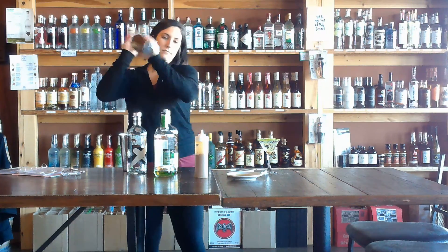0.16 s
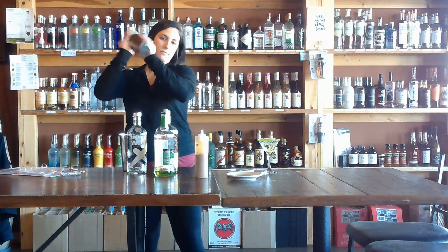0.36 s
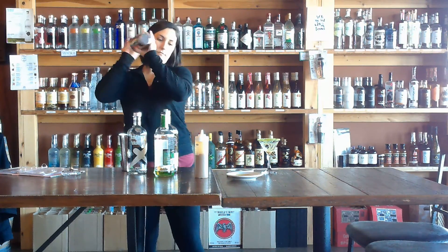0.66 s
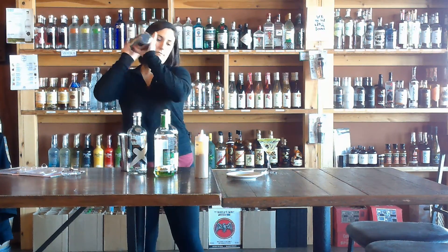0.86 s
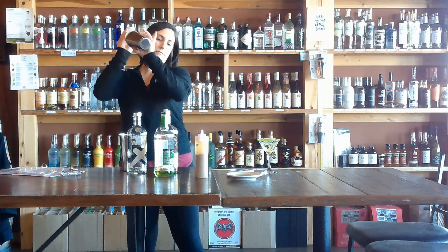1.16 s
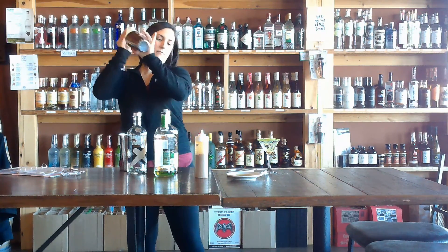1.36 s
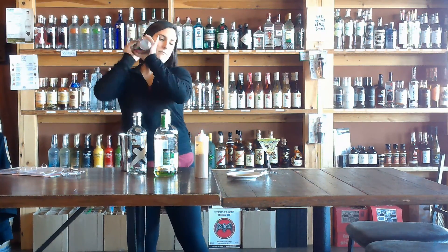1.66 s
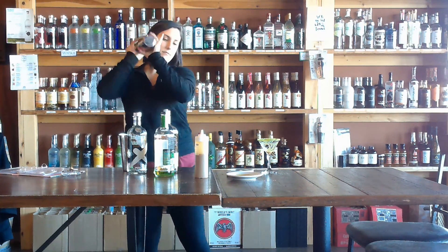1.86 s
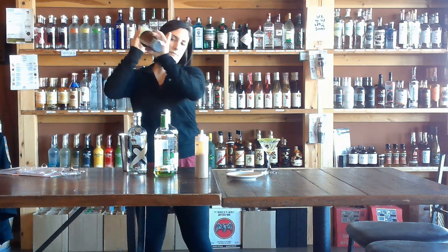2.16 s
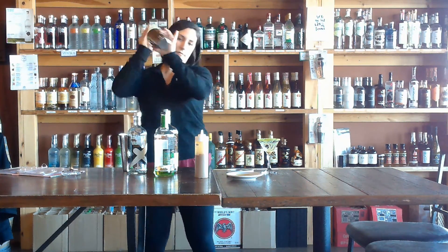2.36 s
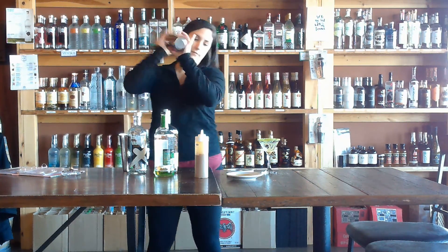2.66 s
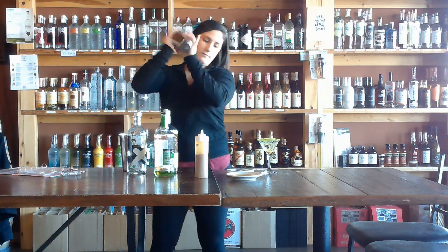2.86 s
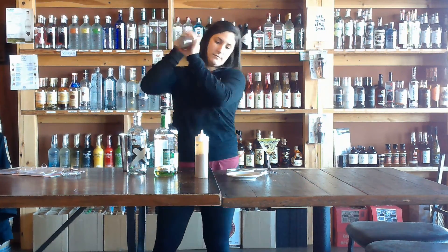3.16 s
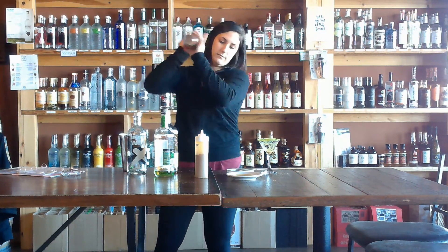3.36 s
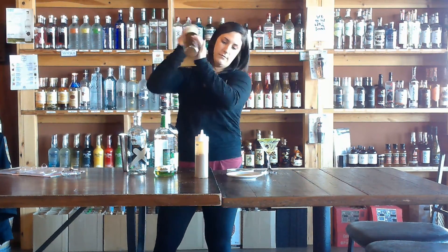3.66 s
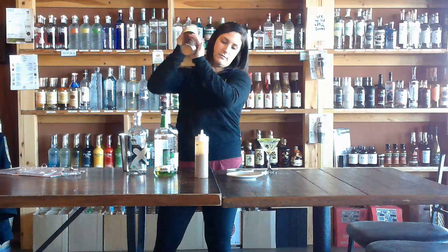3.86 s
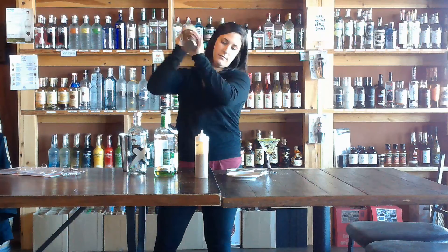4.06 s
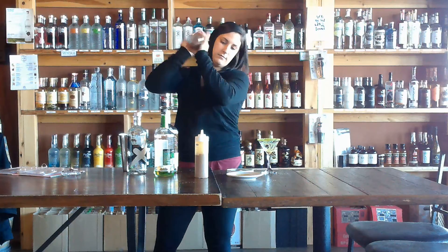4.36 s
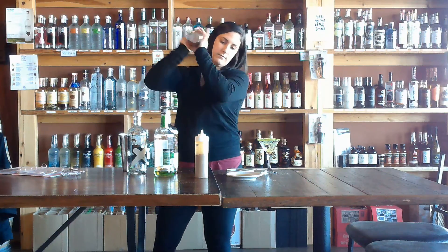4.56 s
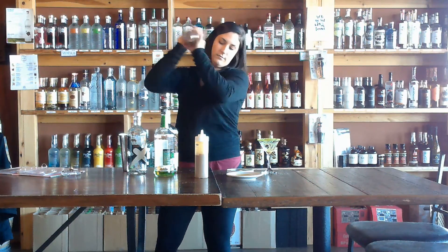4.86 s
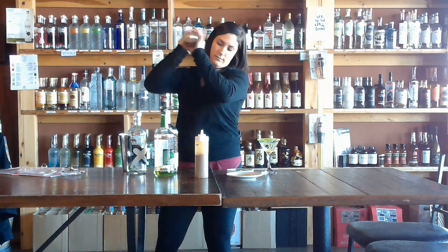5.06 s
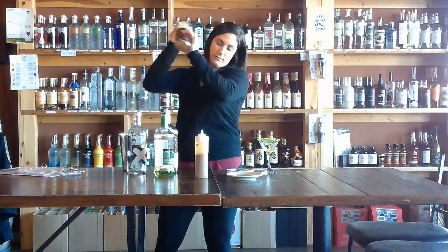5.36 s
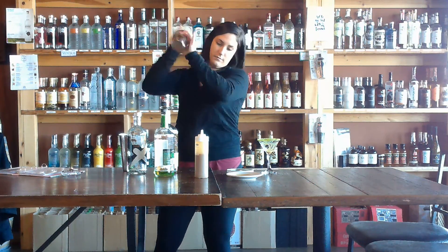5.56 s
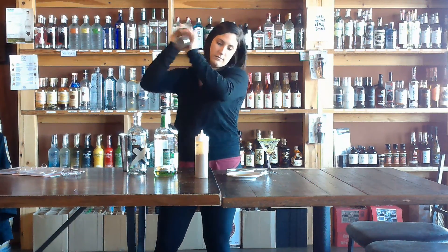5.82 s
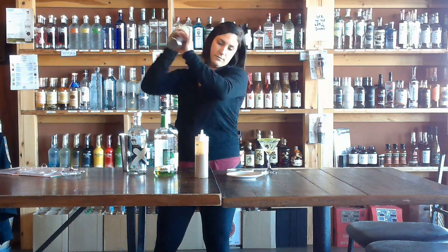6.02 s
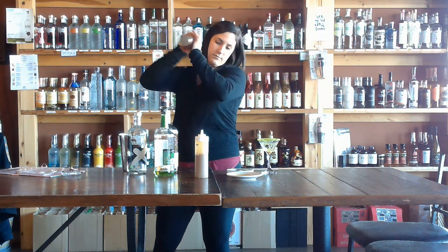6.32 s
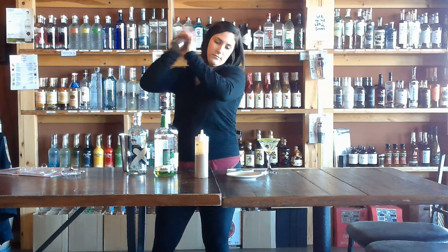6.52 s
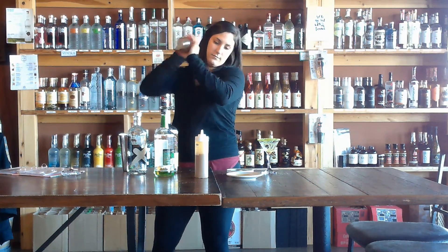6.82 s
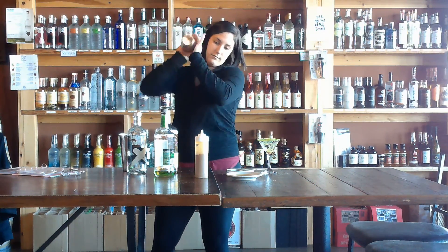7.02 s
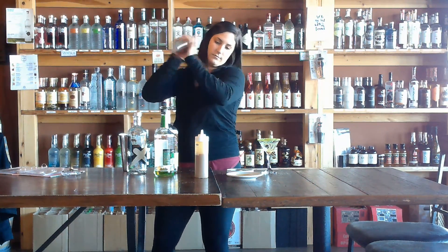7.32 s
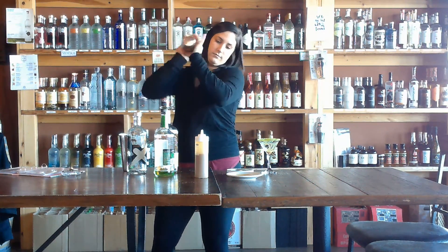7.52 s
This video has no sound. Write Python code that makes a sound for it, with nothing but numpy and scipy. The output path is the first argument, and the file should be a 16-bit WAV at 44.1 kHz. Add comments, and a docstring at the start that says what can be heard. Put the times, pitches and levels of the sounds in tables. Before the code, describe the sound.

From 0 to about 7.7 seconds, ice is shaken vigorously in a hand-held steel cocktail tin, already in motion at the start and still going at the end. Nearly ten strokes a second land alternately at the cap, brighter and fizzier, and at the base, lower with a muted slosh. Each is a grainy burst of damped metallic ringing around 1.7 to 6 kHz. Loudness varies; strokes thin out around 1.7, 3.5 and 4.5 seconds. Short hollow cube knocks stand out near 1.0, 1.4, 2.4, 3.9 and 5.4, with dry ice ticks scattered between. Early echoes and a reverberant tail under a second suggest a wooden bar, heard from a few metres, the tin slightly right. Underneath, a low vehicle engine swells until 1.2, drops to a lower note near 1.8 and recedes by 3, leaving faint traffic rumble, bassy room tone and fridge hum.

```python
"""Ice is shaken in a steel cocktail tin a few metres from a stereo microphone in a wooden bar room.
Each stroke ends in a shower of grains ringing the tin's modes, a fizz of chips and a slosh;
damped sines make the knocks of big cubes, very short noise snaps their cracks and lone ticks.
The room answers with a cluster of echoes and a tail of decaying noise bands; behind it lie
noise-band room tone, a fridge's sine hum and resonant noise for a vehicle and traffic outside."""
import sys
import numpy as np
from scipy import signal
from scipy.fft import rfft, irfft
from scipy.io import wavfile

SR = 44100
rng = np.random.default_rng(int(sys.argv[2]) if len(sys.argv) > 2 else 0)


def transcribe(signal):
    """Save signal, clipped to [-1, 1], as a 16-bit WAV file at the path in sys.argv[1]."""
    frames = np.atleast_2d(signal).T
    limited = np.clip(frames, -1, 1)
    pcm = np.round(limited * 32767).astype(np.int16)
    wavfile.write(sys.argv[1], SR, pcm)


def nominal_scale(level):
    """Amplitude ratio for a level in decibels (scalar or array-like)."""
    x = np.asarray(level, float) / 20
    return 10 ** x


N = 338996
T = np.arange(N) / SR

# The load lands in the cap and on the base of the tin in turn, cap first.
# Each row: start in seconds, relative ice level in dB, relative fizz level of fine chips in dB.
STROKES = [(0.046, -33, -60), (0.144, -37, -45), (0.223, -35, -43), (0.341, -39, -55),
           (0.432, -36.5, -39.5), (0.568, -34, -32.5), (0.7, -30.5, -35), (0.779, -36, -36),
           (0.875, -33.5, -39), (0.966, -28.5, -30.5), (1.075, -29.5, -36), (1.19, -36, -40),
           (1.281, -31, -34.5), (1.387, -35, -40), (1.48, -37.5, -43), (1.582, -33.5, -38),
           (1.68, -56.5, -55), (1.785, -50.5, -59.5), (1.89, -34, -40), (1.984, -30, -34),
           (2.112, -37, -39), (2.203, -33.5, -37), (2.31, -35, -37), (2.394, -34.5, -34),
           (2.506, -35.5, -35), (2.631, -38, -47), (2.735, -29.5, -37), (2.831, -29, -30),
           (2.949, -34, -44), (3.052, -33.5, -34), (3.153, -32.5, -34.5), (3.248, -36, -37),
           (3.377, -34, -32), (3.469, -58.5, -52), (3.57, -37.5, -39), (3.672, -33.5, -38),
           (3.778, -30.5, -35), (3.88, -28.5, -38), (4.014, -32, -37.5), (4.102, -36, -40),
           (4.233, -32, -33), (4.315, -36, -38), (4.445, -30, -35.5), (4.541, -57, -56),
           (4.643, -32.5, -52), (4.737, -35, -36), (4.85, -30.5, -33.5), (4.94, -31, -35),
           (5.04, -38, -41.5), (5.161, -44.5, -55), (5.276, -32, -31), (5.36, -37, -32), (5.496, -30, -42),
           (5.618, -30.5, -45), (5.711, -33.5, -35), (5.844, -33.5, -36), (5.968, -29, -32.5),
           (6.071, -35.5, -35), (6.194, -31.5, -37), (6.289, -34.5, -48), (6.393, -31.5, -47.5),
           (6.517, -40, -53), (6.636, -32, -36), (6.749, -51, -43), (6.836, -32, -42), (6.953, -38.5, -39),
           (7.062, -30.5, -33.5), (7.174, -34, -37), (7.292, -28.5, -32), (7.412, -37.5, -34),
           (7.552, -29, -38.5), (7.661, -36, -42)]


def unit(x):
    """Scale to rms 1."""
    return x / np.sqrt(np.mean(x ** 2))


def shape(x, gain):
    """Filter by a gain given as a function of Hz."""
    n = x.shape[-1]
    freq_hz = np.arange(n // 2 + 1) * SR / n + 1  # 1 Hz up, clear of zero
    return irfft(rfft(x) * gain(freq_hz), n)


def colour(x, points):
    """Filter through (Hz, dB) points, interpolated over log frequency."""
    hz, db = np.transpose(points)
    return shape(x, lambda f: nominal_scale(np.interp(np.log(f), np.log(hz), db)))


def resonate(x, modes):
    """Sum of (Hz, width Hz, dB) resonances of alternating sign that ring after their cause."""
    def response(f):
        total = 0
        for k, (hz, width_hz, db) in enumerate(modes):
            total = total + (-1) ** k * nominal_scale(db) / (1 + 1j * (f - hz * hz / f) / width_hz)
        return total
    return shape(x, response)


def add(out, start_s, sound):
    """Mix a sound in at start_s."""
    i = max(int(start_s * SR), 0)
    out[i:i + len(sound)] += sound[:N - i]


def rattle():
    """Pieces ring the tin, fine chips fizz, the liquid thumps lower."""
    # Chips crowd into the cap, the liquid falls on the base.
    # Each holds: chips over the ice in dB, relative slosh level in dB.
    cap_end = (4.9, -56)
    base_end = (-4.5, -37.5)
    # Slosh resonances. Each row: centre in Hz, width in Hz, relative level in dB.
    slosh_modes = [(730, 270, -21.5), (1098, 250, 2.5), (1410, 270, -3.5)]
    # Spectrum of the fine chips. Each row: frequency in Hz, relative density in dB per Hz.
    fizz_spectrum = [(3000, -35.5), (6000, 1), (8000, 1.5), (11000, 1.5), (14000, 3.5), (15800, 3.5),
                     (20000, -31)]
    _, cubes_db, fizz_db = np.transpose(STROKES)
    more_chips_db, slosh_db = np.resize([cap_end, base_end], (len(STROKES), len(cap_end))).T
    cubes = surge(cubes_db, 0.0016, 0.012, -45.5)
    chips = surge(cubes_db + more_chips_db, 0.0013, 0.012, -41.5)
    fizz = grains(6000, 2.4) * surge(fizz_db, 0.00046, 0.013, -46.5)
    slosh = grains(3000, 3.9) * surge(slosh_db, 0.0028, 0.021, -65)
    # the lowest mode rings most when cubes and liquid land together
    base = surge(0.59 * cubes_db + 0.381 * slosh_db, 0.0025, 0.015, -46.5)
    ringing = nominal_scale(10.5) * clatter(base, cubes, chips)
    return ringing + nominal_scale(5.5) * colour(fizz, fizz_spectrum) + nominal_scale(14.5) * resonate(slosh, slosh_modes)


def clatter(base, cubes, chips):
    """Every piece lands somewhere else, so it rings one mode, at a pitch shifted by the load on the wall."""
    # Hand-damped tin: cubes ring its low modes, chips the high ones.
    # Each row: unshifted centre in Hz, width in Hz, relative level in dB.
    tin_modes = [(1750, 314, 4.5), (2260, 700, -4), (3095, 444, 0.5), (3700, 270, -1.5), (4540, 380, -4.5),
                 (5430, 570, -6.5), (6450, 3500, -11.5)]
    out = np.zeros(N)
    for hz, width_hz, db in tin_modes:
        shower = base if hz < 2000 else cubes if hz < 4000 else chips
        for shift in (-0.026, 0, 0.026):  # share of the pitch
            out += resonate(grains(400, 3.3) * shower, [(hz * (1 + shift), width_hz, db)])
    return out


def grains(per_s, spread_db):
    """Random small collisions, most faint, a few strong."""
    size = rng.standard_normal(N) * nominal_scale(spread_db * np.minimum(rng.exponential(size=N), 4))
    return unit(size * (rng.random(N) < per_s / SR))


def surge(stroke_db, base_rise_s, power_fall_s, between_db):
    """Level of a shower that swells as the load arrives and thins as it settles; loose ice slides in between."""
    cap_slower = 3.0  # the narrow cap fills more gradually than the flat base
    t = T[:SR // 2]
    power = np.full(N, nominal_scale(2 * between_db))
    for k, (start_s, level_db) in enumerate(zip(np.transpose(STROKES)[0], stroke_db)):
        rise_s = base_rise_s * (1 if k % 2 else cap_slower)
        rise = 1 - np.exp(-t / rise_s)
        add(power, start_s, nominal_scale(2 * level_db) * rise ** 2 * np.exp(-t / power_fall_s))
    return np.sqrt(power)


def knocks():
    """Each cube rings the held tin for a few milliseconds, at a pitch set by where the load lies."""
    # Big cubes hit the tin, each 1 ms ahead of its listed time. Each row: time in seconds,
    # relative ring level in dB, ring pitch in Hz, relative crack level in dB, ring length in seconds.
    cube_hits = [(0.3533, -17.5, 1660, -49, 0.0018), (0.7646, -16.5, 1710, -31, 0.0032),
                 (0.9646, -12.5, 1790, -22, 0.0036), (1.3884, -12.5, 1785, -31.5, 0.0034),
                 (1.5764, -13.5, 1748, -26, 0.0036), (1.6206, -20, 1780, -44, 0.0032),
                 (1.7881, -16.5, 1756, -45, 0.0025), (1.99, -18, 1788, -17, 0.0094),
                 (2.193, -17.5, 1715, -36, 0.0043), (2.399, -17, 1750, -20, 0.012),
                 (2.629, -17.5, 1705, -24, 0.0035), (2.839, -21, 1560, -19.5, 0.0025),
                 (3.0542, -22.5, 1750, -26, 0.003), (3.2532, -19.5, 1750, -29, 0.0076),
                 (3.677, -21.5, 1584, -39.5, 0.0033), (3.8903, -9.5, 1758, -40, 0.0042),
                 (4.113, -17.5, 1696, -45, 0.0043), (4.3178, -25.5, 1680, -41, .004),
                 (4.95, -24.5, 1790, -43, 0.0032), (5.3668, -15.5, 1767, -20, 0.0044),
                 (5.487, -30, 1750, -27.5, .004), (6.0583, -17, 1768, -33, 0.0027),
                 (6.733, -20, 1750, -27, 0.0033), (6.9611, -30, 1800, -24, 0.0044),
                 (7.1074, -28, 1730, -37, 0.0045), (7.172, -19.5, 1800, -24.5, 0.0023),
                 (7.377, -29, 1970, -39, .003), (7.673, -24, 1730, -36.5, .004)]
    out, t = np.zeros(N), T[:SR // 16]
    push = 1 - np.exp(-t / 0.0005)
    thud = 0.092 * np.sin(2 * np.pi * 1100 * t) * np.exp(-np.log(1000) * t / 0.033)
    for (s, db, hz, crack_db, ring_s), noise in zip(cube_hits, rng.standard_normal((len(cube_hits), 256))):
        ring = np.sin(2 * np.pi * hz * t) + 0.17 * np.sin(2 * np.pi * 1.17 * hz * t)
        decay = np.exp(-(t / ring_s) ** 2) + 0.16 * np.exp(-t / (3.7 * ring_s))
        add(out, s - 0.001, nominal_scale(db + 4) * push * (ring * decay + thud))
        add(out, s - 0.001, nominal_scale(crack_db + 14.5) * crack(noise))
    return out


def ticks():
    """Lone sharp ticks of ice on ice: each a single snap."""
    # Each row: start in seconds, relative level in dB.
    ice_ticks = [(0.145, -17), (0.17, -18), (0.3845, -20), (0.552, -22), (3.3822, -15), (4.2486, -16),
                 (4.736, -21.5), (5.284, -27.5), (5.624, -19), (5.7039, -16), (5.9714, -21), (6.5126, -22),
                 (7.406, -19), (7.5451, -23)]
    out = np.zeros(N)
    for (start_s, db), noise in zip(ice_ticks, rng.standard_normal((len(ice_ticks), 256))):
        add(out, start_s, nominal_scale(db + 8.5) * crack(noise))
    return out


def crack(noise):
    """Very short snap: coloured noise falling 60 dB in 5 ms."""
    # Spectrum of the snap. Each row: frequency in Hz, relative density in dB per Hz.
    snap_spectrum = [(800, -12), (2000, -37), (5000, 0), (8000, -16.5), (10500, -5.5), (14500, -3.5)]
    return colour(noise, snap_spectrum) * np.exp(-np.log(1000) * T[:len(noise)] / 0.005)


def room(x):
    """The tin keeps moving, so each moment reaches the microphone by slightly different paths."""
    # The microphone's right side faces the tin: left port against right.
    # Each row: frequency in Hz, gain in dB.
    left_port = [(300, -6.7), (700, -2.5), (1600, -2.5), (2800, .1), (5000, 0), (12000, -0.5)]
    places, places_per_s, lead = 14, 40, 64  # lead in samples
    place = T * places_per_s % places
    out = np.zeros((2, N))
    for k in range(places):
        away = np.abs((place - k + places / 2) % places - places / 2)
        share = np.cos(np.pi / 2 * np.minimum(away, 1))
        # near paths of neighbouring places are alike and add in pressure, tails add in power
        near = signal.oaconvolve((x * share ** 2)[None], paths(lead), axes=1)
        out += near[:, lead:N + lead]
        wash = signal.fftconvolve((x * share)[None], tail(), axes=1)
        out += wash[:, :N]
        # the shaking has been going on: the room is already full at the start
        out[:, :wash.shape[1] - N] += nominal_scale(3.5) * wash[:, N:]
    return np.array([colour(out[0], left_port), out[1]])


def paths(lead):
    """Direct sound and first echoes from one place of the tin, all lead samples late."""
    # First echoes. Each row: mean delay in ms, relative left level in dB, relative right level in dB.
    first_echoes = [(12.834, 11, -34), (16.83, 6, 1), (19.87, 10.5, -17), (23.1, -5, 9.5), (25.32, -6, -23),
                    (36.06, -8, -43.5)]
    # Further shading of the direct sound on the left. Each row: frequency in Hz, gain in dB.
    left_shading = [(700, -16), (1750, -2.5), (3000, -6.5), (8000, -7.5), (15000, -6.5)]
    direct = signal.unit_impulse(shape=2048, idx=lead)
    echoes = np.zeros((2, len(direct)))
    shifts_ms = 0.066 * rng.standard_normal(len(first_echoes))
    for (ms, left_db, right_db), shift_ms in zip(first_echoes, shifts_ms):
        i = lead + int((ms + shift_ms) * SR / 1000)
        echoes[:, i] = nominal_scale(-10.0 + np.array([left_db, right_db]))
    echoes = colour(echoes, [(2000, -1.5), (5000, -7.5), (16000, -4.5)])
    lag_samples = 2.5 + 1.16 * rng.standard_normal()
    left = shape(colour(direct, left_shading), lambda f: np.exp(-2j * np.pi * f * lag_samples / SR))
    return echoes + [left, direct]


def tail():
    """Diffuse room tail: noise bands each decaying at its own rate, the treble faster than the middle."""
    # Decay. Each row: frequency in Hz, time to fall 60 dB in seconds.
    decay_times = [(500, 0.62), (1700, 0.91), (4000, 0.43), (8000, 0.26), (16000, 0.29)]
    t = T[:24576]
    hz, t60_s = np.transpose(decay_times)
    out, noise = 0, pair(len(t))
    for centre_hz in 350 * 2 ** np.arange(0, 6, 0.5):
        band = shape(noise, lambda f: np.exp(-(np.log2(f / centre_hz) / 0.27) ** 2))
        band_t60_s = np.interp(np.log(centre_hz), np.log(hz), t60_s)
        out = out + band * np.exp(-np.log(1000) * t / band_t60_s)
    # the walls are some metres off, so the tail builds up late
    return out * nominal_scale(-31.0) * np.clip((t - 0.008) / 0.032, 0, 1)


def pair(size):
    """Diffuse noise at two close ports: alike in the bass, unlike in the treble."""
    # Side under mid. Each row: frequency in Hz, side gain in dB.
    port_unlikeness = [(60, -18.5), (170, -13.5), (350, -8), (700, -6), (1500, -5.5), (3000, 0),
                       (6000, 0.8)]
    mid, side = rng.standard_normal((2, size))
    side = colour(side, port_unlikeness)
    return np.array([mid + side, mid - side])


def outside():
    """Vehicle whose engine drops to a lower note and leaves, and deep traffic rumble: resonant noise."""
    # Vehicle. Each row: time in seconds, high note level in dB, low note level in dB.
    vehicle_levels = [(0.0, -36.5, -45), (1.24, -34.5, -47), (1.79, -40, -38), (2.05, -45.5, -47.5),
                      (2.89, -54.5, -47.5), (3.38, -50.5, -57), (7.69, -48.5, -64)]
    # Traffic rumble. Each row: time in seconds, level in dB.
    rumble_levels = [(0, -47), (1.1, -40), (2.0, -46.5), (4.8, -45), (7.69, -47.5)]
    # One list each for high note, low note and rumble, applied twice.
    # Each row: centre in Hz, width in Hz of one pass, relative level in dB of one pass.
    outside_modes = [
        [(119.2, 18.7, 5.5), (158.4, 22.7, 2), (180.2, 18.5, 2.5), (270, 69, -3.5), (510, 370, -8)],
        [(95.6, 20, 0)],
        [(48.54, 21, 0)],
    ]
    s, *notes_db = np.transpose(vehicle_levels)
    levels_db = [np.interp(T, s, db) for db in notes_db]
    levels_db.append(np.interp(T, *np.transpose(rumble_levels)))
    out = np.zeros((2, N))
    for modes, db in zip(outside_modes, levels_db):
        out += unit(resonate(resonate(pair(N), modes), modes)) * nominal_scale(db)
    return out


def fridge_hum():
    """Steady sine hum of the fridge."""
    # Each row: frequency in Hz, rms level in dB.
    hum_partials = [(120, -60)]
    return sum(nominal_scale(db) * np.sqrt(2) * np.sin(2 * np.pi * hz * T) for hz, db in hum_partials)


def room_tone():
    """Steady coloured noise, mostly bass."""
    # Spectrum. Each row: frequency in Hz, relative density in dB per Hz.
    tone_spectrum = [(12, -5), (20, 15.5), (43, -3), (87, 0), (125, -11.5), (206, -9.5), (350, -14),
                     (484, -11), (670, -17), (795, -11), (897, -7.5), (1200, -21), (1560, -8), (2640, -120)]
    return nominal_scale(-44) * unit(colour(pair(N), tone_spectrum))


def scene():
    """The tin in the room over the background."""
    tin = rattle() + knocks() + ticks()
    return room(tin) + outside() + fridge_hum() + room_tone()


def top_cut(x):
    """Nothing passes above the cut-off."""
    return signal.sosfilt(signal.butter(12, 16960, fs=SR, output="sos"), x)


def record(dry):
    """Steep elliptic low-pass at 15740 Hz cuts the top."""
    low_pass = signal.ellip(10, 0.2, 45, 15740, fs=SR, output="sos")
    mix = signal.sosfilt(low_pass, dry)
    return top_cut(mix)


dry = scene()
out = record(dry)
transcribe(out)
```